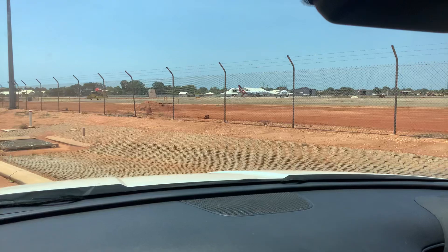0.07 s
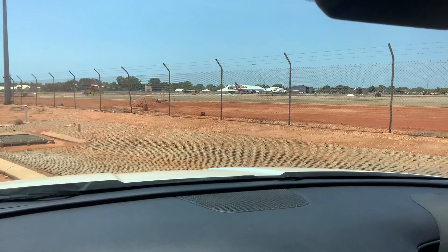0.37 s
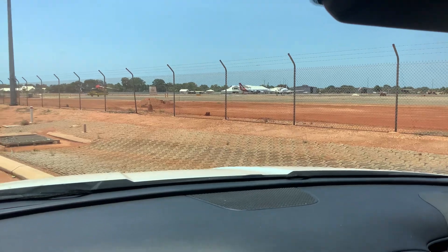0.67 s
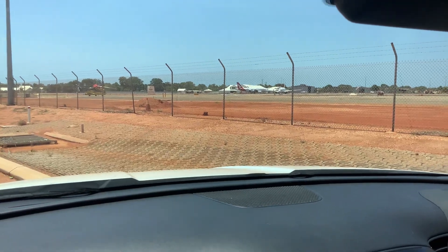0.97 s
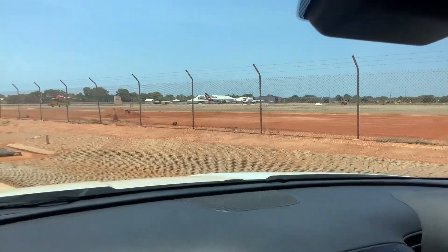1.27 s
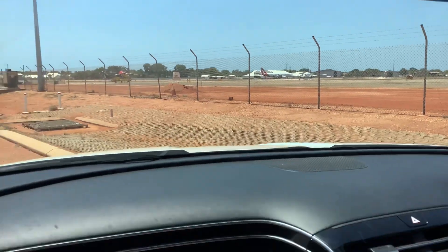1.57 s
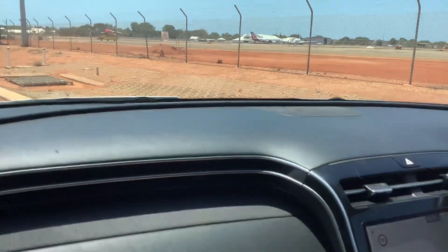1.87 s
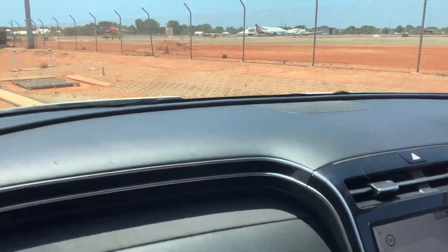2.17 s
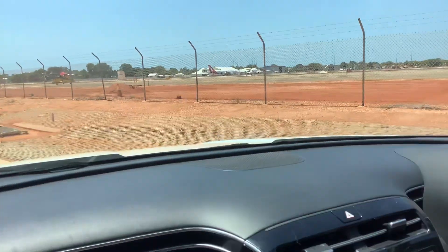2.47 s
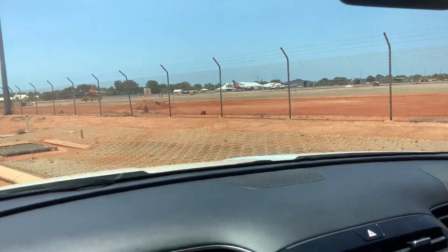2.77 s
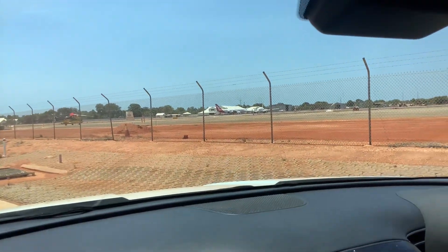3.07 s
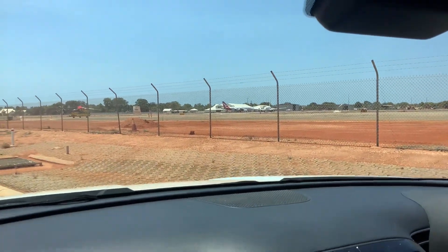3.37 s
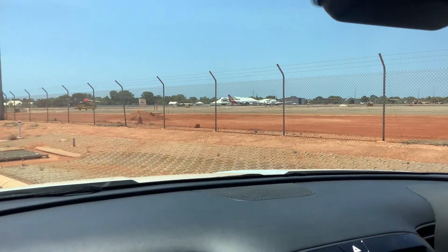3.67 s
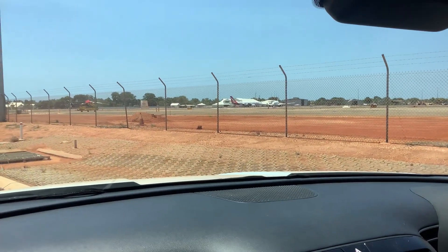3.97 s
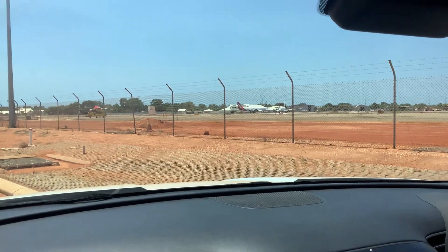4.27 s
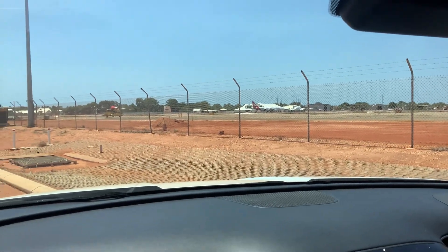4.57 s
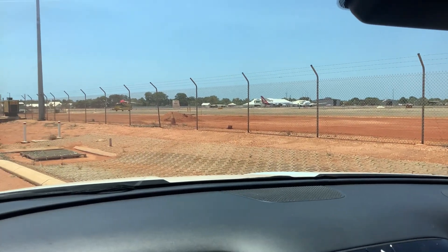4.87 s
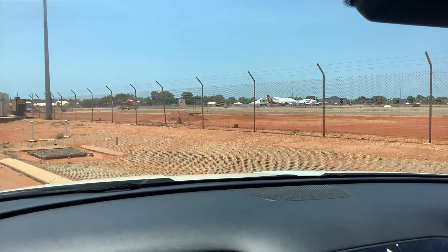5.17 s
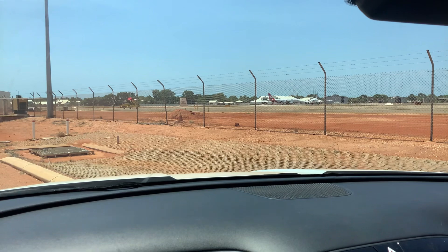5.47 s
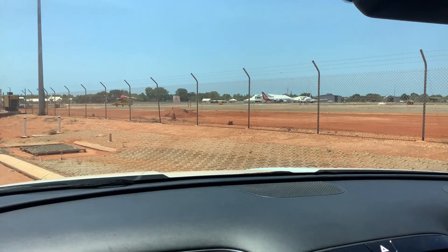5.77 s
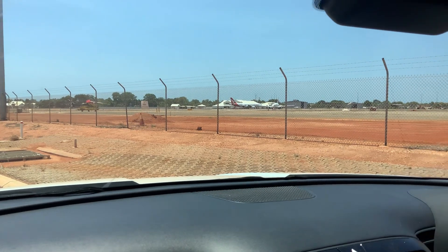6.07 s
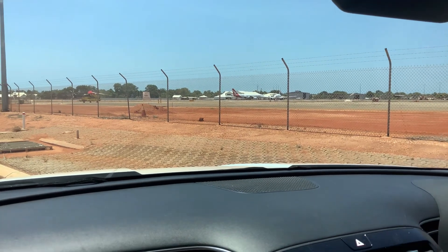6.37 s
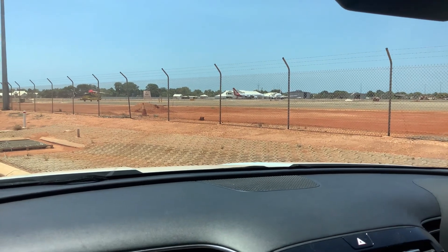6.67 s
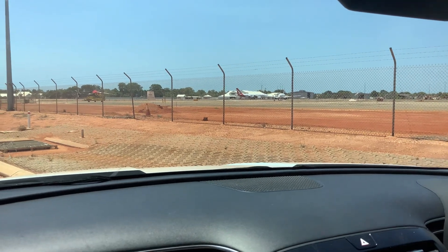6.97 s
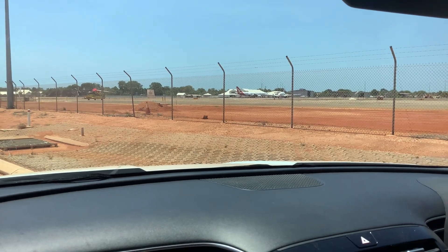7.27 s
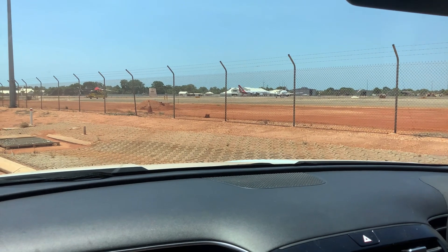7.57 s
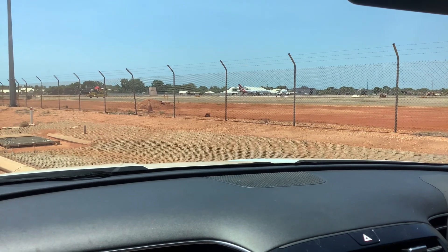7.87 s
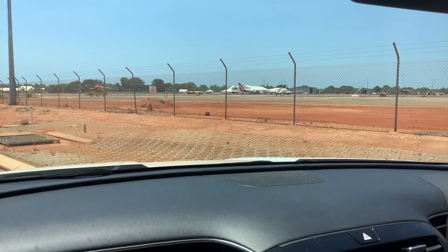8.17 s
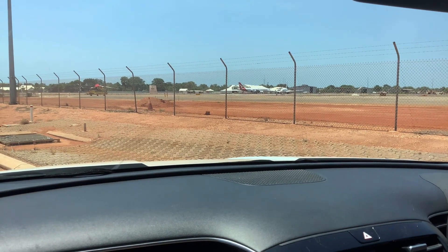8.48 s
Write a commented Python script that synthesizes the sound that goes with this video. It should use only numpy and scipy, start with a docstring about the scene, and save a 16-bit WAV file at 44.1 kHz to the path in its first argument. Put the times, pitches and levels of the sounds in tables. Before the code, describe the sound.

A steady rush of vent air and a low engine idle fill the cabin of a stationary car, heard through a handheld phone. Within the first second, close knocks, clicks and scuffs begin as the grip changes, and the cupped hand shifts the tone of the air for a couple of seconds. After that come only small fingertip judders, and late on the engine's drone gently swells and falls back.

```python
"""Inside a parked car: turbulent air rushes from the dashboard vents over the idling engine.
A hand shifts its grip on the listening phone: fingers knock, rub and judder on the case,
the palm rumbles against it, and the hollow of the hand colours the rush near the microphone.
Late on, the engine's second order swells once into a boom."""
import sys
import numpy as np
from scipy import signal
from scipy.fft import rfft, irfft, next_fast_len
from scipy.io import wavfile
from scipy.ndimage import map_coordinates

SR = 44100
rng = np.random.default_rng(int(sys.argv[2]) if len(sys.argv) > 2 else 0)


def master(y):
    """Save y as 16-bit WAV."""
    cut = np.clip(np.atleast_2d(y).T, -1, 1)
    pcm = np.round(cut * 32767)  # scale
    wavfile.write(sys.argv[1], SR, pcm.astype(np.int16))


N = 375291
SHIFT_START_S, SHIFT_END_S, LOOSEN_S = 0.76, 2.4, 0.04  # the hand shifts its grip


def vents(level_db=-43.5, flutter_db=0.21):
    """Turbulent air rushes from the vents, with three fixed treble peaks from the microphone port."""
    # air spectrum: f/Hz, relative density/dB
    air = [(150, -22), (260, -3), (350, -3), (650, -7), (950, -7.5), (1500, -7), (2100, -5.5), (2850, -8.5),
           (3250, -16.5), (4600, -20), (5400, -28), (7700, -36.5), (11000, -40.5), (15500, -45)]
    # microphone port resonances: f/Hz, width/Hz, gain/dB
    port = [(4080, 540, 3.5), (6660, 580, 7.5), (9020, 460, 5)]
    rush = unit(filtered(noise(air), lambda hz: amp(humps(port, hz))))
    return rush * amp(level_db + flutter_db * wobble(7))


def reflections(x, t60_s=0.12, wet_gain=0.38, highpass_hz=1800):
    """Glass and trim return the treble within moments, rippling its spectrum."""
    t = np.arange(SR // 8) / SR
    tail = rng.standard_normal(len(t)) * amp(-60 * t / t60_s)
    wet = signal.fftconvolve(x, tail / np.linalg.norm(tail))[:N]
    return x + filtered(wet, lambda hz: wet_gain * hz ** 2 / (hz ** 2 + highpass_hz ** 2))


def hand(x, settle_s=0.14, grip_db=1.5, shifting_db=0.96):
    """The phone's pose colours the rush: gripped, cupped in the palm, then at rest."""
    # resonances between hand and case: f/Hz, width/Hz, gain/dB
    grip = [(423, 74, 4), (704, 90, 11.5), (1137, 125, 8.5), (1760, 88, 8.5), (2270, 115, 6),
            (4560, 350, 4), (8800, 740, 2.5)]
    # standing waves between windscreen and dashboard, at the resting spot: f/Hz, width/Hz, gain/dB
    standing = [(445, 40, 6), (825, 69, 5.5), (948, 45, -6), (1107, 58, 6), (1480, 95, 3), (1747, 63, 3),
                (2130, 87, -3), (2375, 167, 5.5)]
    hz, t, spectra = signal.stft(x, SR, nperseg=1024)
    hz = hz[:, None] + 1
    shifting = gesture(t, SHIFT_START_S, SHIFT_END_S, LOOSEN_S, settle_s)
    gripped = 1 - step(t, SHIFT_START_S, LOOSEN_S) + 0.18 * shifting
    settled = step(t, SHIFT_END_S, settle_s) + 0.2 * shifting
    gain_db = gripped * (grip_db + humps(grip, hz)) + settled * humps(standing, hz)
    gain_db += shifting * shifting_db + cupping_db(t, hz, shifting)
    return signal.istft(spectra * amp(gain_db), SR, nperseg=1024)[1][:N]


def cupping_db(t, hz, shifting, rest_hz=2386, rest_db=-5, near_db=5.5, upper_db=2, mirror_share=0.17):
    """Gain of the hand's hollow: each cupping boosts its resonance and glides the pitch."""
    # cuppings: start/s, end/s, first f/Hz, last f/Hz, boost shared by hollow and palm/dB
    cups = [(0.788, 1.09, 2330, 2140, 6.5), (1.18, 1.29, 3050, 3000, 7), (1.5, 2.02, 2730, 1740, 6.5),
            (2.15, 2.356, 2400, 4000, 4.5)]
    cup_hz, boost_db = rest_hz, rest_db + near_db * shifting
    for start, end, first_hz, last_hz, db in cups:
        closed = gesture(t, start, end, attack_s=0.028, release_s=0.041)
        cup_hz = cup_hz + closed * (np.interp(t, [start, end], [first_hz, last_hz]) - rest_hz)
        boost_db = boost_db + closed * db
    first_mode = hollow(hz, cup_hz, width_oct=0.28)
    upper_mode = hollow(hz, 1.6 * cup_hz, width_oct=0.15)
    mirror = hz ** 2 / (hz ** 2 + 1500 ** 2)  # the palm reflects short waves only
    shape = (1 - mirror_share) * first_mode + mirror_share * mirror
    return boost_db * shape + shifting * upper_db * upper_mode


def hollow(hz, centre_hz, width_oct):
    """Bell-shaped resonance of the air in the palm, 0 to 1."""
    return np.exp(-(np.log2(hz / centre_hz) / width_oct) ** 2)


def knocks():
    """Fingers strike the case."""
    # blows: t/s, chirp peak/dB, chirp top/Hz, chirp bottom/Hz, click re chirp/dB, click top/Hz
    blows = [(.722, -22.5, 900, 300, -20, 4000), (0.7379, -21, 700, 150, -2, 6000),
             (0.7409, -15.5, 170, 114, -30, 3000), (.7808, -7.5, 650, 380, -7.5, 3250),
             (0.878, -29.5, 700, 300, -30, 3000), (1.4858, -15, 2800, 270, 3, 3100),
             (1.661, -26, 250, 110, -30, 3000), (1.8730, -24, 1100, 260, -4, 2300),
             (2.1182, -13, 520, 223, -9, 3150), (2.426, -15.5, 425, 112, -11, 14000),
             (2.4535, -22, 400, 128, -2.5, 7500), (2.469, -25, 750, 300, -30, 3000),
             (2.589, -29.5, 450, 200, -28, 3000), (2.9690, -25.5, 700, 200, -25, 2500),
             (3.332, -30.5, 450, 221, -30, 3000)]
    out = np.zeros(N + SR)
    for start, db, *tone in blows:
        blow = amp(db) * knock(*tone)
        out[round(start * SR):][:len(blow)] += blow
    return out[:N]


def knock(high_hz, low_hz, click_db, click_top_hz, thud_db=-10, thud_hz=170, click_t60_s=0.0094):
    """Bending waves carry treble faster than bass: a click, then a falling chirp ending in a thud."""
    dispersion_cycles, lead_s = 1.78, 0.00051
    t = np.arange(SR // 10) / SR
    hz = dispersion_cycles / (t + lead_s)
    band = 1 / np.sqrt((1 + (hz / high_hz) ** 4) * (1 + (low_hz / hz) ** 6))
    thud = amp(thud_db) * np.exp(-2 * np.log2(hz / thud_hz) ** 2)  # the whole case gives
    chirp = np.maximum(band / band.max(), thud) * np.sin(2 * np.pi * np.cumsum(hz) / SR)
    burst = rng.standard_normal(len(t)) * amp(-60 * t / click_t60_s)
    cushioned = signal.lfilter(*signal.butter(1, 4000, fs=SR), burst)  # skin dulls the treble
    contact = signal.butter(3, [1400, click_top_hz], "band", fs=SR, output="sos")
    click = signal.sosfilt(contact, cushioned)
    return chirp + amp(click_db) * click / np.abs(click).max()


def rubs(grain_db=1.5, grain_hz=450):
    """Sliding skin: a dull scuff through the case, a hiss near the microphone port."""
    # strokes: start/s, length/s, scuff/dB, hiss/dB
    strokes = [(0.632, 0.15, -62, -56), (0.723, 0.027, -32.5, -39), (0.974, 0.048, -44, -51),
               (1.147, 0.094, -31.5, -54), (1.482, 0.041, -32, -51), (2.037, 0.062, -32.5, -38.5),
               (2.2, 0.081, -45, -60), (2.28, .078, -46, -46), (2.456, 0.01, -37.5, -47),
               (2.786, 0.028, -43.5, -58)]
    # scuff spectrum: f/Hz, relative density/dB
    scuff_spectrum = [(50, -6), (130, 2), (400, 6.5), (1100, 3.5), (1900, 1), (2600, 1.5), (3000, 3),
                      (3500, -8.5), (4700, -7.5), (5700, -33), (9000, -30), (15500, -53)]
    # hiss spectrum: f/Hz, relative density/dB
    hiss_spectrum = [(300, -31), (1500, -15), (2800, 4), (4800, -1), (5800, -4.5), (7000, -2.5), (8200, -8),
                     (11000, -8.5), (15500, -13)]
    t = clock()
    scuff, hiss = np.zeros(N), np.zeros(N)
    for start, length, scuff_db, hiss_db in strokes:
        stroke = gesture(t, start, start + length, attack_s=0.16 * length, release_s=0.24 * length)
        scuff += amp(scuff_db) * np.sqrt(stroke)
        hiss += amp(hiss_db) * stroke
    grain = unit(amp(grain_db * wobble(grain_hz)))  # skin catches unevenly
    return grain * (scuff * noise(scuff_spectrum) + hiss * noise(hiss_spectrum))


def judders(sag=0.14, jitter=0.0307, overtone_db=-20):
    """A fingertip sticks and slips, humming in the case, louder and faster with pressure."""
    # drags: start/s, end/s, slip rate/Hz and level/dB at full pressure
    drags = [(1.69, 1.86, 141, -33), (3.43, 3.5, 112, -38.5), (5.199, 5.323, 160, -32.5),
             (5.59, 5.63, 105, -34.5), (6.41, 6.458, 114, -34)]
    t, out = clock(), np.zeros(N)
    for start, end, slip_hz, db in drags:
        pressure = gesture(t, start, end, attack_s=0.015, release_s=0.022)
        hz = slip_hz * (1 - sag * (1 - pressure)) * (1 + jitter * wobble(60))
        phase = 2 * np.pi * np.cumsum(hz) / SR
        hum = np.sin(phase) + amp(overtone_db) * np.sin(2 * phase)
        out += pressure * amp(db) * np.sqrt(2) * hum
    return out


def palm_rumble(level_db=-42.5, lump_db=5.0):
    """The shifting palm presses on the case with a soft, lumpy rumble."""
    # case spectrum: f/Hz, relative density/dB
    case = [(40, -15), (110, -5), (220, -0.5), (400, -4), (700, -10), (2000, -53)]
    pressing = gesture(clock(), SHIFT_START_S, SHIFT_END_S, LOOSEN_S, release_s=0.41)
    lumps = amp(lump_db * wobble(30))
    return amp(level_db) * pressing * unit(lumps * noise(case))


def engine(firing_hz=27.98, drift=0.0056, rumble_db=-40, sway_db=-0.1):
    """Low firing orders over the body's rumble; the second order swells once into a boom."""
    # engine orders: multiple of the firing rate, rms level/dB
    orders = [(1, -65), (2, -53.5), (3, -51), (4, -53.5)]
    # cabin rumble spectrum: f/Hz, relative density/dB
    cabin = [(15, -30), (34, -22), (44, -3.5), (62, -9.5), (85, -2), (115, -2), (155, -4), (200, -9.5),
             (260, -11.5), (400, -31), (900, -60)]
    boom_s, rise_s, fall_s, boom_db = 7.3, 0.58, 0.22, -40.5
    t = clock()
    phase = 2 * np.pi * np.cumsum(firing_hz * (1 + drift * wobble(3.18))) / SR
    hum = sum(amp(db) * np.sin(k * phase + rng.uniform(0, 2 * np.pi)) for k, db in orders)
    swell = np.exp(-np.abs(t - boom_s) / np.where(t < boom_s, rise_s, fall_s))
    boom = amp(boom_db) * swell * np.sin(2 * phase)
    rumble = amp(rumble_db + sway_db * wobble(1.5)) * noise(cabin)
    return np.sqrt(2) * (hum + boom) + rumble


def amp(db):
    """Decibels to gain."""
    return 10 ** (np.asarray(db) / 20)


def unit(x):
    """x at rms 1."""
    return x / np.sqrt(np.mean(x ** 2) + 1e-20)


def humps(rows, hz):
    """Gain in dB of bell-shaped resonances."""
    return sum(db * np.exp(-((hz - centre) / width) ** 2) for centre, width, db in rows)


def clock():
    """Sample times in s."""
    return np.arange(N) / SR


def step(t, at_s, ease_s):
    """Smooth rise from 0 to 1, centred on at_s."""
    return (1 + np.tanh((t - at_s) / (ease_s + 1e-6))) / 2


def gesture(t, start_s, end_s, attack_s, release_s):
    """Attack, hold and release, 0 to 1."""
    return step(t, start_s, attack_s) * (1 - step(t, end_s, release_s))


def wobble(knot_hz):
    """Smooth random curve, rms near 1."""
    return map_coordinates(rng.standard_normal(int(N * knot_hz / SR) + 4), [clock() * knot_hz])


def filtered(x, response):
    """x through a gain given as a function of f/Hz."""
    size = next_fast_len(N + SR // 2)
    return irfft(rfft(x, size) * response(np.fft.rfftfreq(size, 1 / SR)), size)[:N]


def noise(spectrum):
    """Noise of rms 1, shaped by (f/Hz, level/dB) points on a log axis."""
    point_hz, db = np.transpose(spectrum)
    white = rng.standard_normal(N)
    return unit(filtered(white, lambda hz: amp(np.interp(np.log(hz + 1), np.log(point_hz + 1), db))))


def scene():
    """The rush heard past the hand, the engine, and the hand's noises on the case."""
    rush = hand(reflections(vents()))
    return (rush + engine() + palm_rumble() + knocks() + rubs() + judders())[None]


def record(dry):
    """The phone opens its microphone and passes nothing above its band limit."""
    open_s, muted_db, top_hz = 0.071, -63, 15750
    opened = np.maximum(step(clock(), open_s, 0.001), amp(muted_db))
    return filtered(dry[0] * opened, lambda hz: hz < top_hz)[None]


dry = scene()
out = record(dry)
master(out)
```